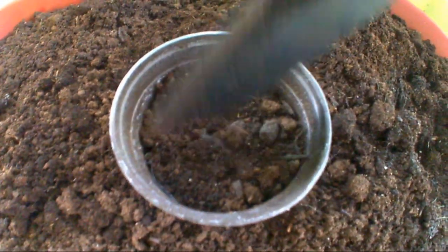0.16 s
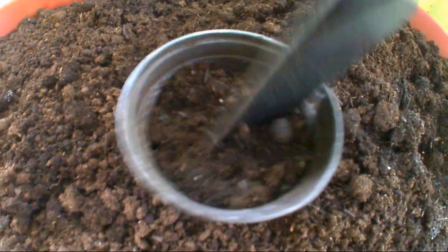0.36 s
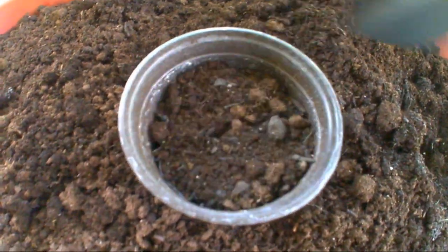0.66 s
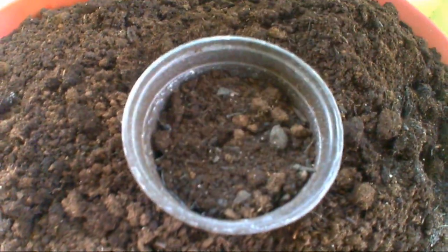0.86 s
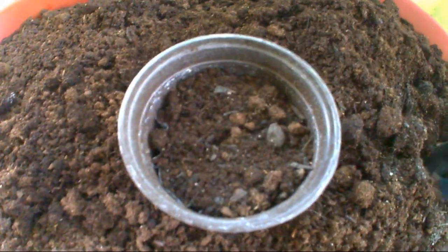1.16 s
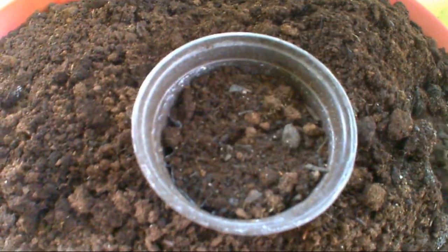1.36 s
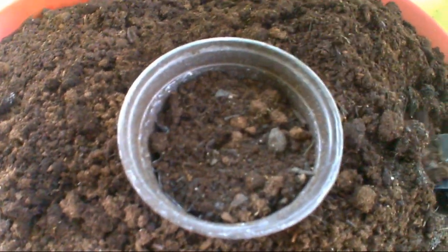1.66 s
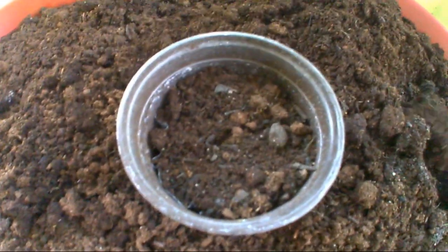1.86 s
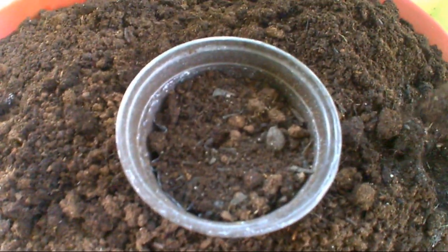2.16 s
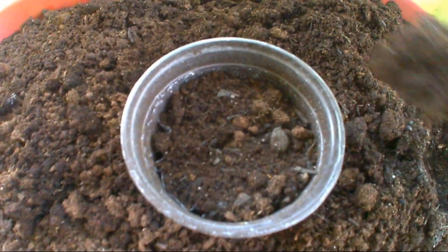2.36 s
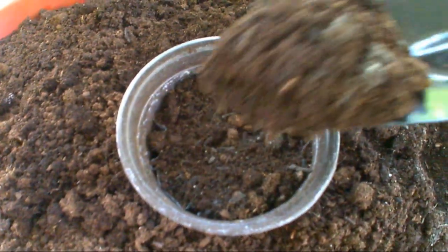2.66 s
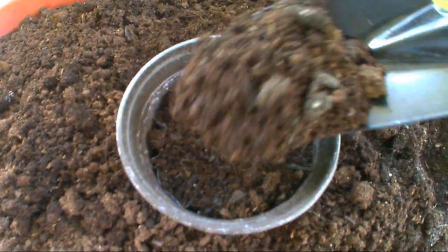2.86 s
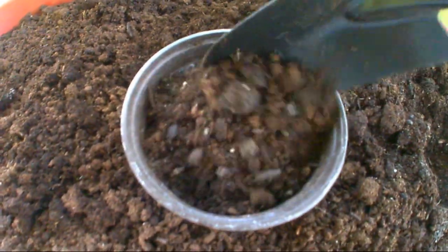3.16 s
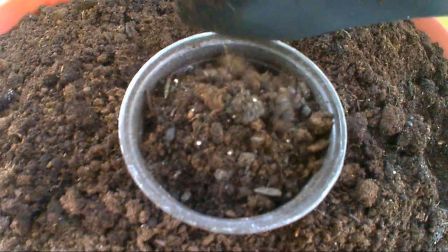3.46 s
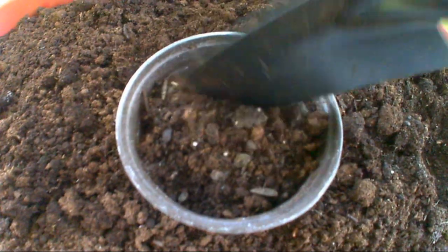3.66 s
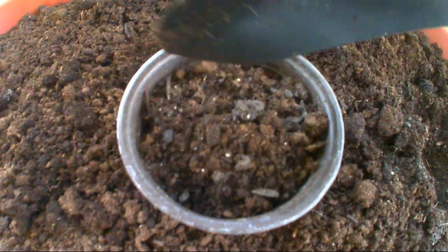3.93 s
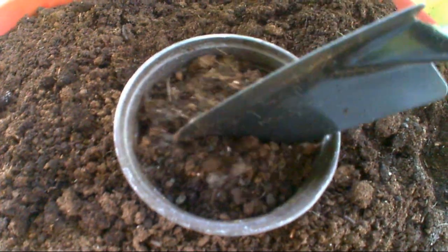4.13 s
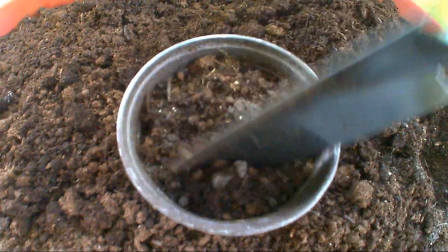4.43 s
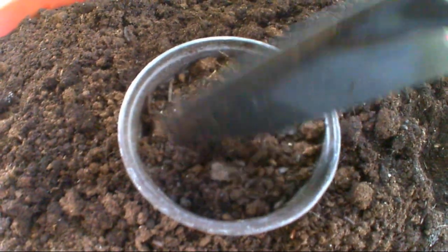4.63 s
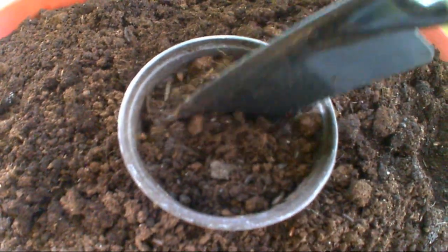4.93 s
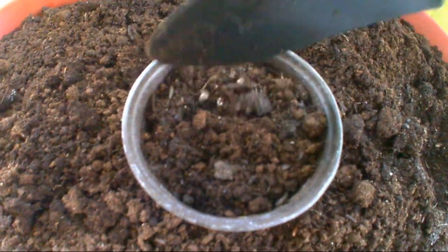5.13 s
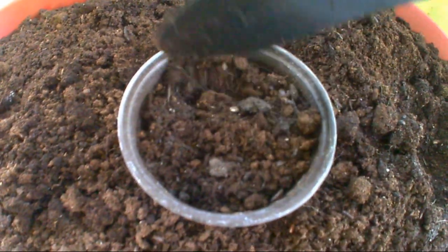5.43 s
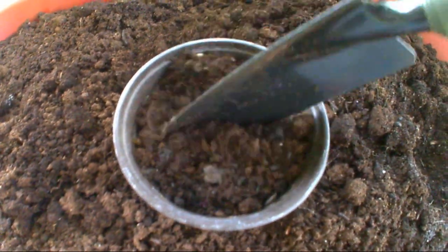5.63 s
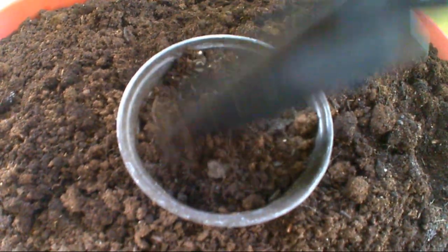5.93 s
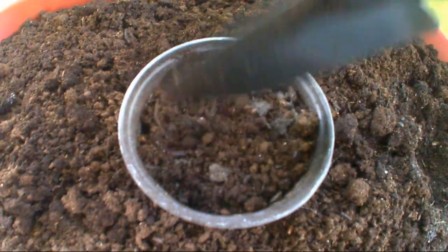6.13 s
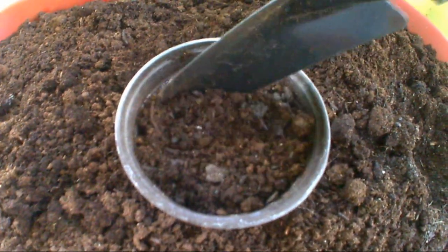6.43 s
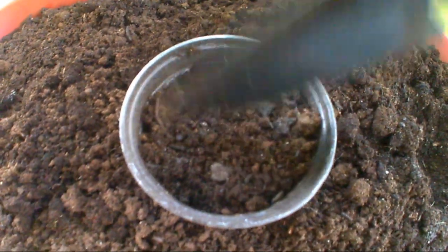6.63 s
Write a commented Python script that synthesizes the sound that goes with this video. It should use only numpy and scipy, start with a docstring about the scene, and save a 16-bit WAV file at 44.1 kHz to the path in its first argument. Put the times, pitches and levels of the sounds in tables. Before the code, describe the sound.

A trowel works soil in a small plastic pot, close to the microphone outdoors. A steady hiss, a wavering low rumble and a faint distant motor hum run throughout. At about 0.4 seconds the blade clicks sharply on the rim, with a gritty scrape and a faint metallic ring. Softer rubs and light taps follow between 1 and 1.6 seconds. After a pause, muffled bumps come at 2.6 seconds. From 3.1 seconds soil crunches into the pot, with another rim click at 3.2 and scattered ticks of grit on thin plastic until 4. A dull knock sounds at 4.2 seconds. From 4.5 seconds on, short quiet strokes rub and crunch through the soil, with tiny ticks and faint blade rings around 5.6 and 6.1. A firm knock and brief scrape come at 6.8 seconds. The sound has little high treble.

```python
"""A trowel tips potting soil into a small plastic pot and levels it, outdoors, close to the microphone.
Soil rubs and crunches along the blade, which clicks on the rim, rings faintly and knocks dully;
grit ticks on the thin plastic. Nearby surfaces give the contacts a short tail.
Behind it lie a steady hiss, a low rumble and the faint hum of a far motor. One narrow-band microphone."""
import sys
import numpy as np
from scipy import signal
from scipy.fft import rfft, irfft, next_fast_len
from scipy.io import wavfile
from scipy.ndimage import map_coordinates

SR = 44100
rng = np.random.default_rng(int(sys.argv[2]) if len(sys.argv) > 2 else 0)


def materialize(psi):
    """Save the field psi as 16-bit PCM at rate SR to the path in sys.argv[1].

    A 1-D psi becomes a single channel; in a 2-D psi each row is a channel.
    """
    bounded = np.clip(np.atleast_2d(psi).T, -1, 1)
    quanta = np.round(bounded * 32767).astype(np.int16)
    wavfile.write(sys.argv[1], SR, quanta)


N = 299439


def amp(db):
    """Decibels to gain."""
    return 10 ** (np.asarray(db) / 20)


def unit(x):
    """x at rms 1."""
    return x / np.sqrt(np.mean(x ** 2) + 1e-20)


def along(points, hz):
    """Interpolate (f/Hz, value) points on a log frequency axis."""
    f, v = np.transpose(points)
    return np.interp(np.log(hz + 1), np.log(f + 1), v)


def bell(distance, width):
    """A Gaussian bump of height 1."""
    return np.exp(-(distance / width) ** 2)


def wobble(rate):
    """A smooth random curve, rate knots a second."""
    knots = rng.standard_normal(int(N * rate / SR) + 4)
    return map_coordinates(knots, [np.arange(N) * rate / SR])


def filtered(x, gain):
    """x times a gain that depends on frequency."""
    size = next_fast_len(N + SR // 4)
    return irfft(rfft(x, size) * gain(np.fft.rfftfreq(size, 1 / SR)), size)[:N]


def coloured(x, spectrum):
    """x shaped by a spectrum, at rms 1."""
    return unit(filtered(x, lambda hz: amp(along(spectrum, hz))))


def muffled(x, hz, order):
    """x through a low-pass."""
    return signal.lfilter(*signal.butter(order, hz, fs=SR), x)


def add(track, s, sound):
    """Mix a sound into the track at s seconds."""
    part = track[round(s * SR):][:len(sound)]
    part += sound[:len(part)]


def grains(spectrum, per_s):
    """A dense run of tiny impacts of random size."""
    return coloured(rng.standard_normal(N) * (rng.random(N) < per_s / SR), spectrum)


def struck(modes, detune=0.0018, attack_s=0.000067):
    """Damped modes, a little different at every blow; neighbours swing in opposite directions."""
    t = np.arange(SR // 4) / SR
    swing = np.zeros(len(t))
    for k, (hz, db, t60) in enumerate(modes):
        decay = amp(db + rng.normal() - 60 * t / t60)
        detuned_hz = hz * (1 + detune * rng.normal())
        swing += (-1) ** k * decay * np.sin(2 * np.pi * detuned_hz * t)
    return swing * (1 - np.exp(-t / attack_s))


def tilted(modes, db_per_octave):
    """Modes made brighter or duller about 2 kHz."""
    return [(hz, db + db_per_octave * np.log2(hz / 2000), t60) for hz, db, t60 in modes]


def crack(t60):
    """A short broadband burst from a rough contact."""
    t = np.arange(SR // 20) / SR
    return rng.standard_normal(len(t)) * amp(-60 * t / t60) * (1 - np.exp(-t / 0.00025))


# spectra of the open air and of its low rumble: f/Hz, level/dB
AIR_SPECTRUM = [(10, 10), (30, 15), (60, 6.5), (130, -1), (190, 5.5), (235, 2), (320, 0.5), (430, -3),
                (620, -1.5), (1000, -6.5), (1600, -10), (2100, -14.5), (4000, -18), (4900, -20),
                (5600, -22.5), (6500, -33), (7500, -29)]
RUMBLE_SPECTRUM = [(40, -14), (70, -4.5), (90, 5), (120, -3), (170, -20), (400, -46)]
# course of the rumble: t/s, level/dB
RUMBLE_LEVELS = [(0, -67), (1, -65), (1.9, -63), (2.8, -64.5), (3.75, -63), (4.1, -71), (4.5, -72.5),
                 (4.8, -64), (5.4, -71.5), (6, -64), (6.8, -65)]
def outdoor_air(hiss_db=-56.5, sway_db=1.5):
    """All around the microphone, a steady hiss and a low rumble that comes and goes."""
    hiss = amp(hiss_db) * coloured(rng.standard_normal(N), AIR_SPECTRUM)
    rumble_db = np.interp(np.arange(N) / SR, *np.transpose(RUMBLE_LEVELS)) + sway_db * wobble(1.3)
    return hiss + amp(rumble_db) * coloured(rng.standard_normal(N), RUMBLE_SPECTRUM)


# tones of the far motor: f/Hz, rms level/dB
MOTOR_TONES = [(59, -70), (239, -73.5), (247.4, -70.5), (494.8, -74), (989, -88)]
def motor_hum(waver_hz=0.59, sway_db=3.0):
    """Far off, a motor hums; each tone wavers in pitch and level."""
    hum = np.zeros(N)
    for hz, db in MOTOR_TONES:
        cycles = np.cumsum(hz + waver_hz * wobble(3.966)) / SR + rng.random()
        hum += np.sqrt(2) * amp(db + sway_db * wobble(3.14)) * np.sin(2 * np.pi * cycles)
    return hum


# the blade pushes through soil: peak t/s, length/s, rub level/dB, crunch re rub/dB, rub centre f/Hz
STROKES = [(0.468, 0.09, -55, -7.5, 1720), (1.028, 0.11, -66.5, -11, 1900),
           (1.148, 0.072, -59.5, -13, 1710), (1.555, 0.086, -61, -10.5, 600), (2.597, 0.04, -70, -23, 750),
           (3.092, 0.024, -60.5, -4.5, 1350), (3.245, 0.045, -57.5, -4, 2200), (3.54, .06, -76, 5, 1400),
           (3.784, 0.14, -69.5, -6.5, 1300), (4.539, 0.084, -63.5, -9.5, 1410),
           (4.901, 0.034, -57, -8.5, 1750), (5.13, 0.054, -70, -4, 1400), (5.293, 0.037, -61, -6, 1420),
           (5.518, 0.037, -72, 2, 2600), (5.655, 0.05, -64, -6, 1500), (6.035, 0.062, -73, 1, 2400),
           (6.417, 0.098, -70, -4, 1400), (6.77, 0.05, -62, -7, 1400)]
def trowel_strokes(rise_share=0.49, edge_db=9):
    """Gain of each stroke and of all their crunch; a stroke is edge_db down at both ends of its length."""
    t = np.arange(N) / SR
    swells, crunch_gain = [], np.zeros(N)
    for s, length, db, crunch_db, _ in STROKES:
        from_peak = np.maximum((s - t) / rise_share, (t - s) / (1 - rise_share)) / length
        swells.append(amp(db - edge_db * from_peak))
        crunch_gain += swells[-1] * amp(crunch_db)
    return swells, crunch_gain


# spectra of soil rubbing and crunching: f/Hz, level/dB
RUB_SPECTRUM = [(150, -4), (430, 6), (850, -11.5), (1050, -2), (1350, -2.5), (1800, -7), (2300, -11),
                (2750, -5), (3300, -22.5), (7000, -31)]
CRUNCH_SPECTRUM = [(1200, -49), (2500, 1), (3200, -1.5), (4100, 0.5), (4800, -2.5), (5500, -15.5),
                   (6400, -6.5), (7000, -26), (7600, -17)]
# resonances of the scraped blade: f/Hz, width/Hz, lift/dB
BLADE_RESONANCES = [(1470, 35, 5), (1760, 85, 6), (2620, 56, 5)]
def sliding_soil(swells, crunch_gain, focus_db=6, focus_octaves=0.61):
    """Close up, each stroke rubs the pot in its own register and stirs the blade; crumbs crunch on top."""
    blade = lambda hz: amp(sum(db * bell(hz - centre, width) for centre, width, db in BLADE_RESONANCES))
    rub = filtered(grains(RUB_SPECTRUM, per_s=2200), blade)
    out = crunch_gain * grains(CRUNCH_SPECTRUM, per_s=3000)
    for swell, (*_, centre_hz) in zip(swells, STROKES):
        focus = lambda hz: amp(focus_db * bell(np.log2((hz + 1) / centre_hz), focus_octaves))
        out += swell * unit(filtered(rub, focus))
    return out


# the pot wall under a crumb: f/Hz, level/dB, t60/s
CRUMB_MODES = [(1610, 1, 0.0045), (4060, 15, 0.0054), (4600, 13, 0.0045), (6360, 5, 0.004)]
def loose_crumbs(crunch_gain, per_s=450, spread_db=2.5, tick_db=-10, pot_db=2):
    """Strokes flick crumbs at the wall, harder when the soil crunches; the pot colours each tick."""
    hits = (rng.random(N) < per_s / SR) * amp(spread_db * rng.standard_normal(N))
    tick = struck(CRUMB_MODES, detune=0.018, attack_s=0.00022)
    pot = struck(tilted(WALL_MODES + HOLLOW_MODES, db_per_octave=3.5))
    impact = amp(tick_db) * tick / np.abs(tick).max() + amp(pot_db) * pot / np.abs(pot).max()
    return signal.fftconvolve(hits * crunch_gain, impact)[:N]


# the thin pot wall and the air inside it: f/Hz, level/dB, t60/s
WALL_MODES = [(1196, -8.5, 0.011), (1560, 3, 0.0067), (1990, 2, 0.0072), (2730, -10, 0.0052),
              (3100, -16.5, 0.012), (4150, -5, 0.011), (4965, -8.5, 0.007), (6230, -22.5, 0.0073)]
HOLLOW_MODES = [(416, -12.5, 0.046), (560, -24.5, 0.045), (830, -10, 0.022), (990, -17.5, 0.019)]
# blade on the rim: t/s, wall peak level/dB, hollow gain/dB, brightness/(dB per octave)
RIM_HITS = [(0.4287, -42, -9, 1), (0.4454, -22.5, 3.5, -5), (3.0842, -52, -9, -6), (3.1267, -46.5, -12, 5),
            (3.1297, -47, -8, 2), (3.2155, -34.5, 3.5, 0.5), (4.883, -51, -10, -3), (4.892, -49.5, -4, 8),
            (4.897, -50, -2, -10)]
def rim_clicks(crack_db=-11):
    """The blade edge snaps against the wall; the hollow of the pot answers."""
    out = np.zeros(N)
    for s, db, hollow_db, tilt in RIM_HITS:
        wall = struck(tilted(WALL_MODES, tilt), attack_s=0.00019)
        hollow = struck(HOLLOW_MODES, detune=0.0041, attack_s=0.0023)
        add(out, s, amp(db) * (wall + amp(hollow_db) * hollow) / np.abs(wall).max())
        add(out, s, amp(db + crack_db) * crack(t60=0.014))
    return out


# stones on the blade: t/s, f/Hz, level/dB
BLADE_RINGS = [(0.445, 2680, -55.5), (1.039, 2700, -64.5), (1.531, 2420, -61), (5.637, 2670, -61),
               (6.146, 2700, -59)]
def blade_rings(ring_t60=0.13, low_db=-11, low_t60=0.087, scratch_db=-2, flutter_db=2):
    """A stone scratches the blade, which sings at its pitch and a fifth below, fluttering as soil rubs."""
    out = np.zeros(N)
    for s, hz, db in BLADE_RINGS:
        modes = [(hz, db, ring_t60), (hz * 2 / 3, db + low_db, low_t60)]
        add(out, s, struck(modes, detune=0.0013, attack_s=0.0005))
        add(out, s, amp(db + scratch_db) * crack(t60=0.017))
    return out * unit(amp(flutter_db * wobble(70)))


# hard crumbs drop on the plastic: t/s, peak level/dB, pitch as a ratio to CRUMB_MODES
GRIT_HITS = [(0.4482, -40.5, 0.94), (.486, -54, 1), (0.516, -57, 1.06), (1.5482, -51, 1.05),
             (3.155, -55, 0.94), (3.248, -56, 1), (3.409, -50, 0.99), (3.534, -54, 1.03), (3.55, -56, 1),
             (3.7516, -57, 1), (3.9726, -44, 0.976), (4.0017, -54, .98), (5.4927, -56, 1.03),
             (5.5346, -53.5, 1), (6.033, -60, 1), (6.401, -58.5, 1)]
def grit_ticks(crack_db=-8, crack_hz=5000):
    """Hard crumbs crack on the plastic and stir its high modes, higher or lower by where they land."""
    out = np.zeros(N)
    for s, db, pitch in GRIT_HITS:
        modes = [(hz * pitch, level, t60) for hz, level, t60 in CRUMB_MODES]
        tick = struck(modes, detune=0.021, attack_s=0.0003)
        add(out, s, amp(db) * tick / np.abs(tick).max())
        add(out, s, amp(db + crack_db) * muffled(crack(t60=0.012), crack_hz, order=1))
    return out


# the wall under a blunt contact, and its chatter: f/Hz, level/dB, t60/s
KNOCK_MODES = [(760, -10.5, 0.0048), (1424, -4.5, 0.0062), (2000, -11.5, 0.0081), (2740, -28.5, 0.014),
               (4470, -19, 0.0047)]
CHATTER_MODES = [(3740, -15, 0.0086)]
# the blade bumps the pot: t/s, peak level/dB, cutoff f/Hz
KNOCK_HITS = [(1.151, -46, 4000), (2.5625, -44.5, 1900), (2.573, -53, 1300), (2.594, -45.5, 600),
              (2.606, -51, 700), (3.4228, -43.5, 3600), (3.7951, -46.5, 4180), (4.121, -51, 2480),
              (4.1736, -35, 4600), (5.6372, -51, 2500), (6.7697, -26, 5530)]
def dull_knocks(chatter_delay_s=0.00235, puff_db=-13, puff_hz=2400):
    """A blunt contact swings the wall with a soft puff and a thin chatter; soil muffles it all."""
    out = np.zeros(N)
    for s, db, cutoff_hz in KNOCK_HITS:
        blow = struck(KNOCK_MODES, attack_s=0.00014)
        blow /= np.abs(blow).max()
        add(blow, 0, amp(puff_db) * muffled(crack(t60=0.068), puff_hz, order=1))
        add(blow, chatter_delay_s, struck(CHATTER_MODES, attack_s=0.0001))
        blow = muffled(blow, cutoff_hz, order=3)
        add(out, s, amp(db) * blow / np.abs(blow).max())
    return out


# decay among the surfaces near the pot: f/Hz, t60/s
NEARBY_DECAY = [(300, 0.38), (1500, 0.041), (6000, 0.11)]
def reflections(x):
    """Nearby surfaces return a short, diffuse tail to the microphone."""
    hz, t, noise = signal.stft(rng.standard_normal(SR // 4), SR, nperseg=256)
    decay = amp(-60 * t / along(NEARBY_DECAY, hz)[:, None])
    _, tail = signal.istft(noise * decay, SR, nperseg=256)
    tail = np.pad(tail, (SR // 400, 0))  # 2.5 ms behind the direct sound
    return signal.fftconvolve(x, tail / np.linalg.norm(tail))[:N]


def scene(echo_db=-11):
    """Trowel and pot close up, open air around them, the motor far behind; mono."""
    swells, crunch_gain = trowel_strokes()
    contacts = rim_clicks() + dull_knocks() + grit_ticks() + loose_crumbs(crunch_gain) + blade_rings()
    close = contacts + amp(echo_db) * reflections(contacts) + sliding_soil(swells, crunch_gain)
    return (close + outdoor_air() + motor_hum())[None]


def record(dry, dip_hz=5500, dip_width_hz=320, dip_db=-5.0, rolloff_hz=7100, top_hz=7284,
           whine_hz=11025, whine_db=-96.0, dc_offset=0.041):
    """A narrow-band microphone with a treble dip; its electronics whine faintly and rest off zero."""
    dip = lambda hz: amp(dip_db * bell(hz - dip_hz, dip_width_hz))
    band = lambda hz: 1 / np.sqrt(1 + (hz / rolloff_hz) ** 30) / (1 + (hz / top_hz) ** 40)
    picked_up = filtered(dry[0], lambda hz: dip(hz) * band(hz))
    whine = np.sqrt(2) * amp(whine_db) * np.sin(2 * np.pi * whine_hz * np.arange(N) / SR)
    return (picked_up + whine + dc_offset)[None]


dry = scene()
out = record(dry)
materialize(out)
```